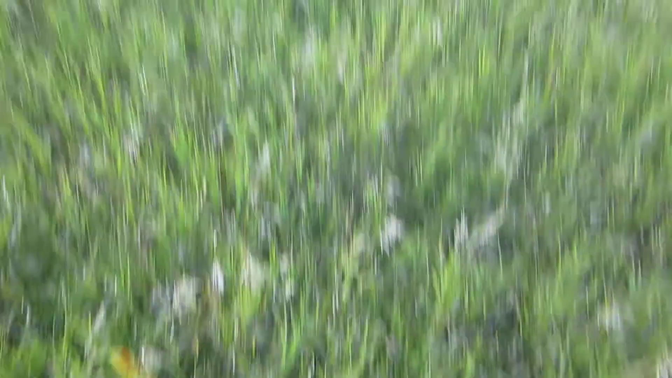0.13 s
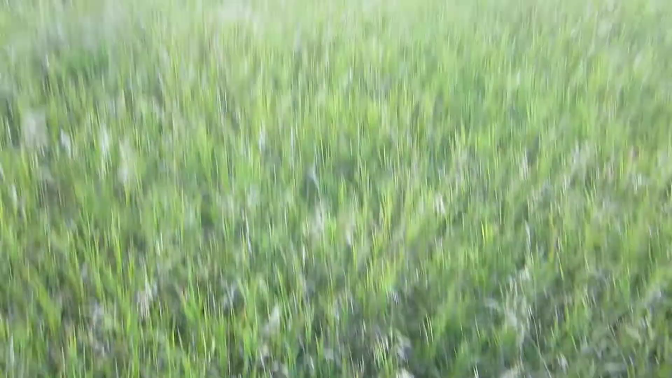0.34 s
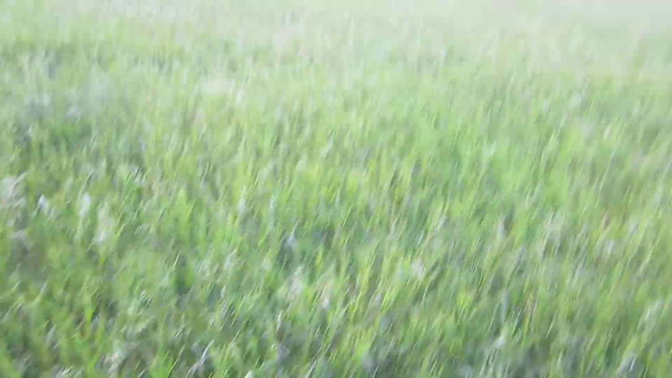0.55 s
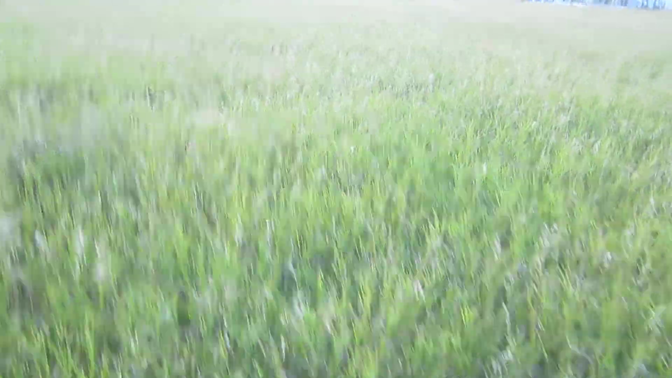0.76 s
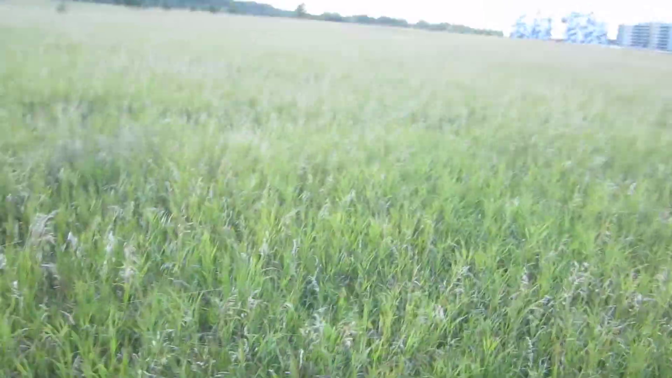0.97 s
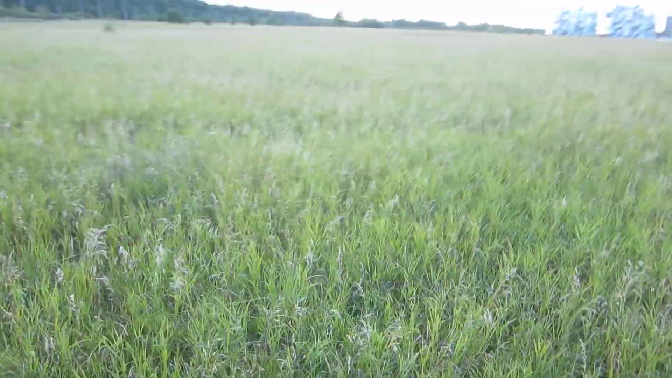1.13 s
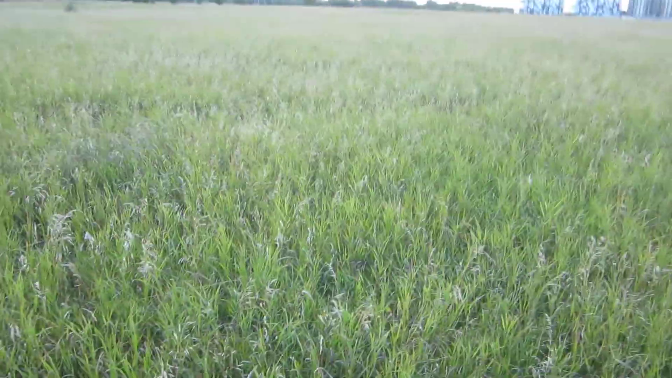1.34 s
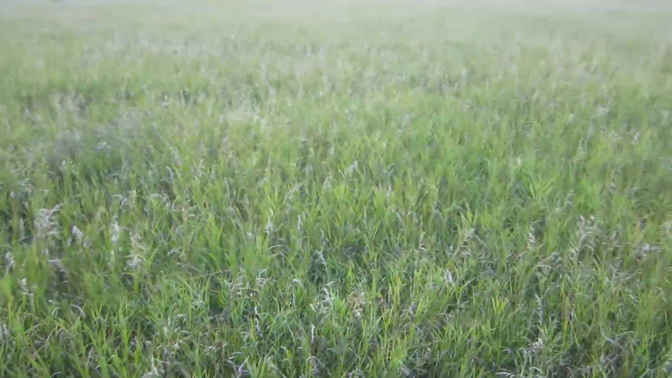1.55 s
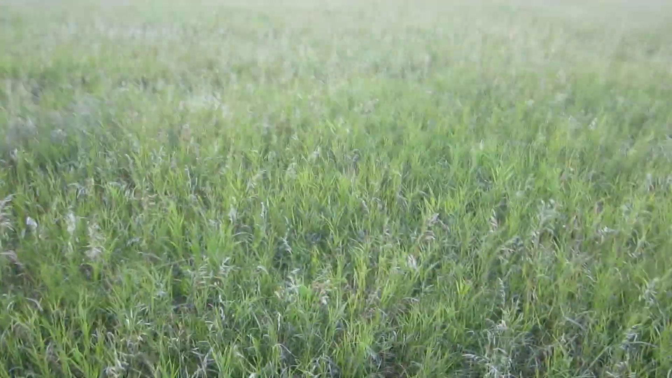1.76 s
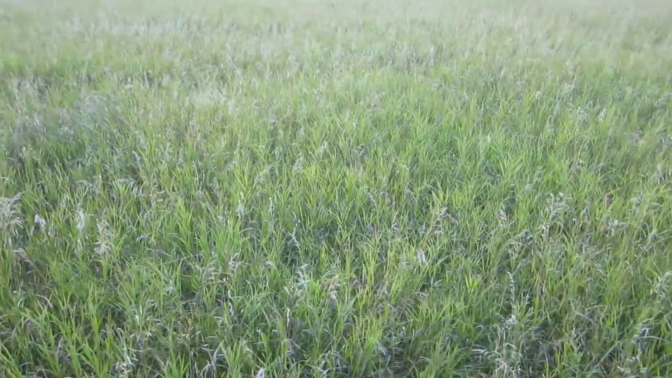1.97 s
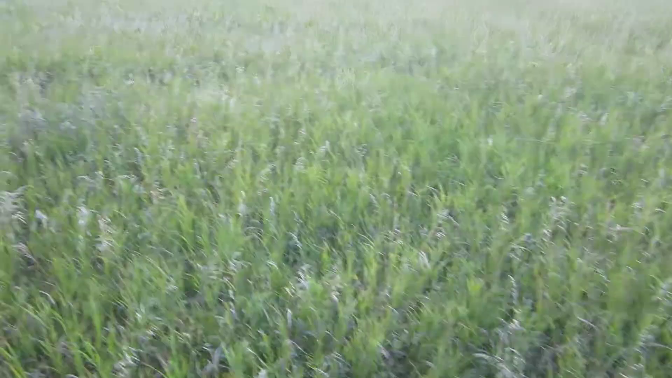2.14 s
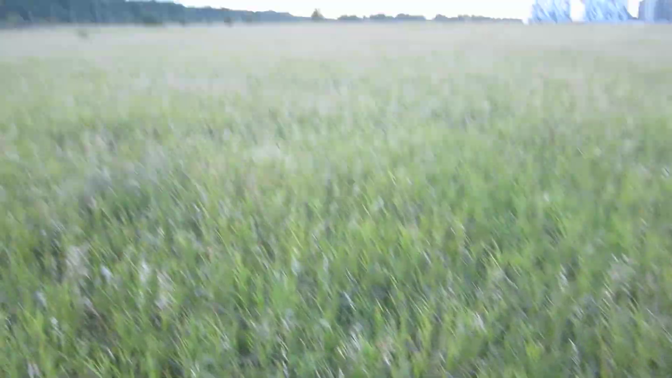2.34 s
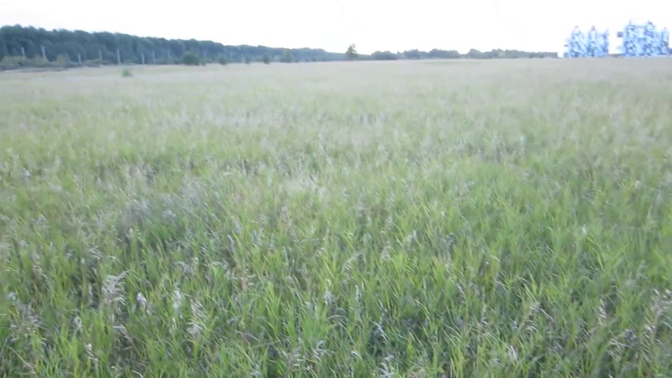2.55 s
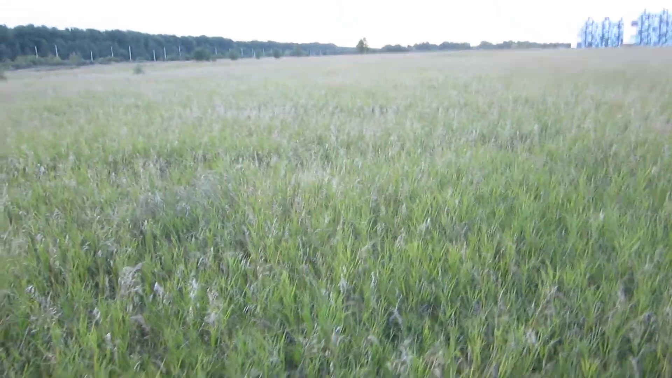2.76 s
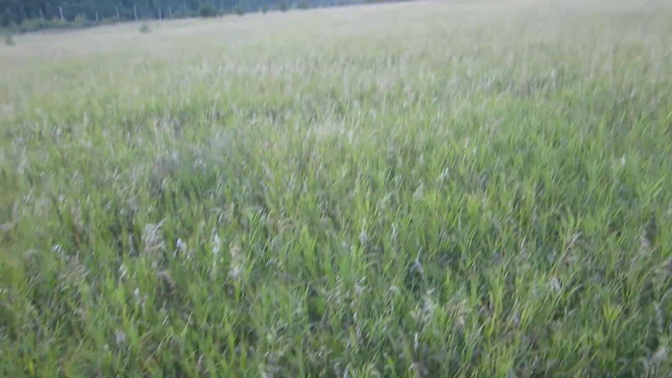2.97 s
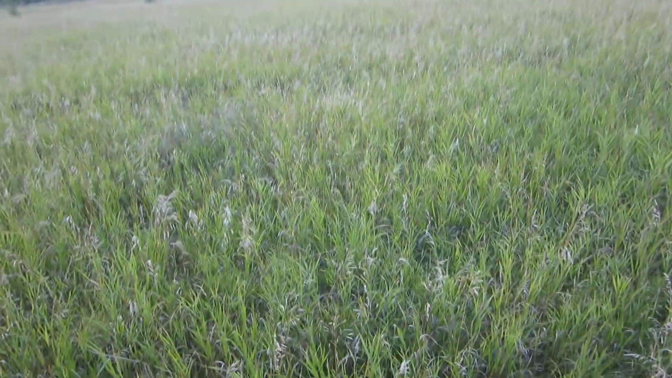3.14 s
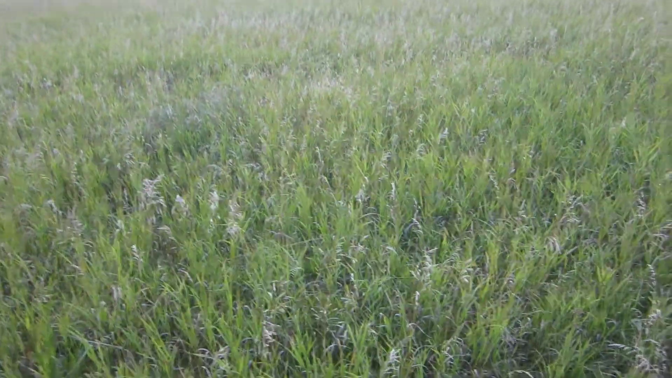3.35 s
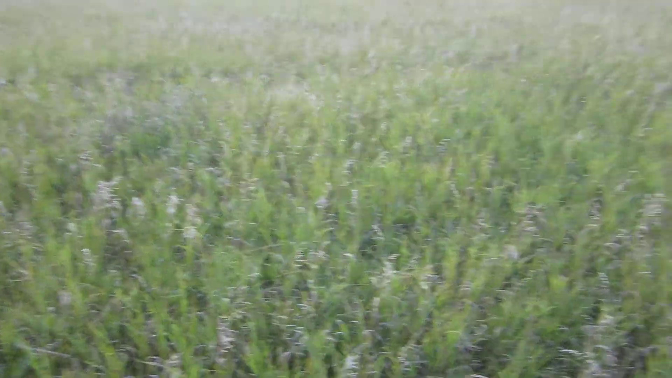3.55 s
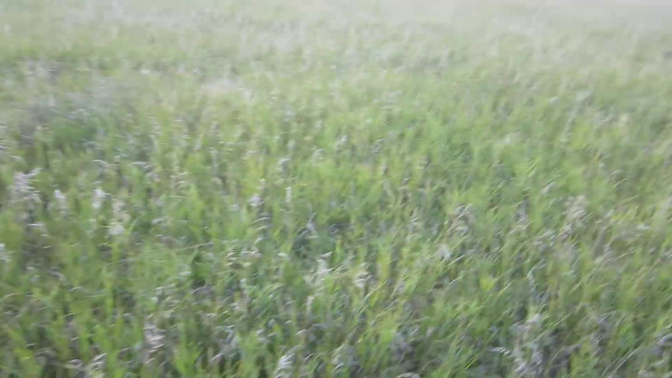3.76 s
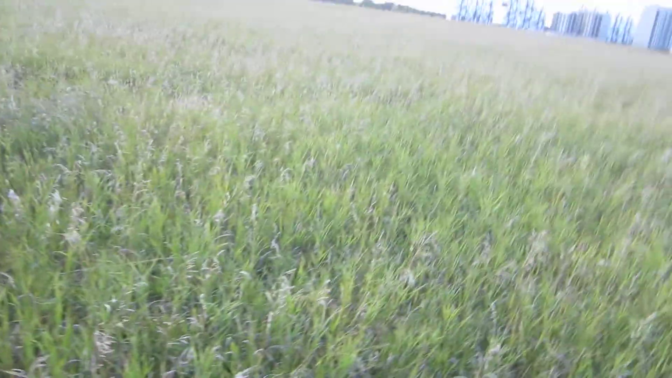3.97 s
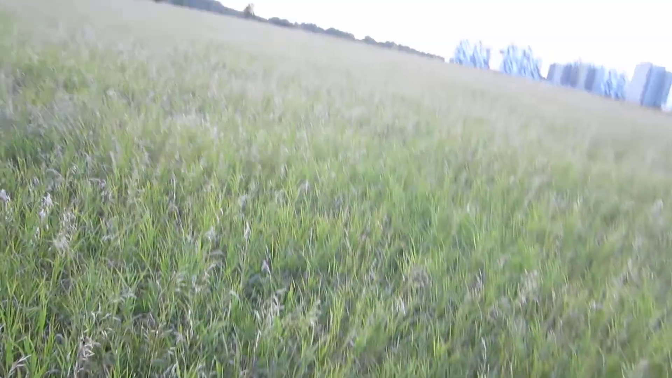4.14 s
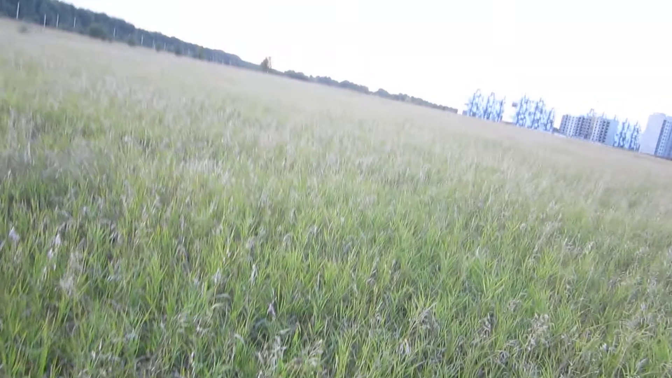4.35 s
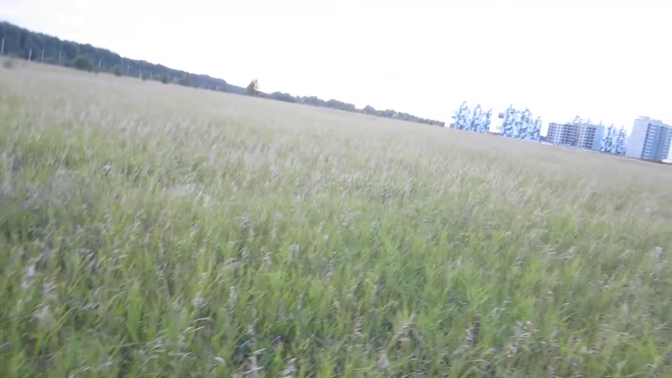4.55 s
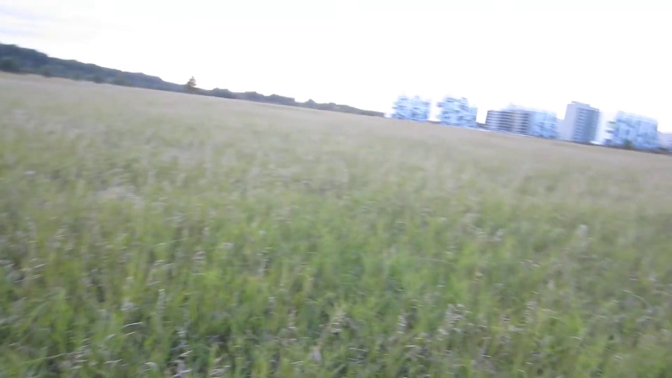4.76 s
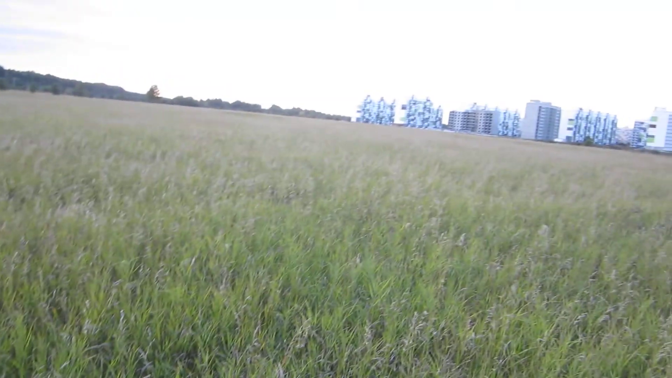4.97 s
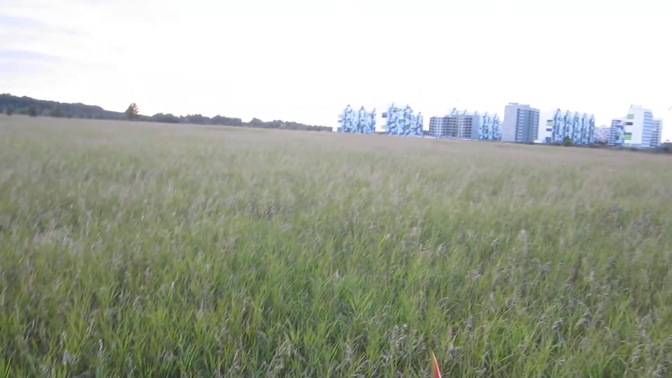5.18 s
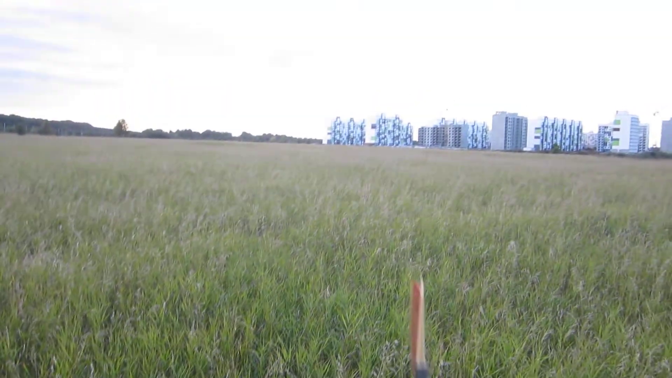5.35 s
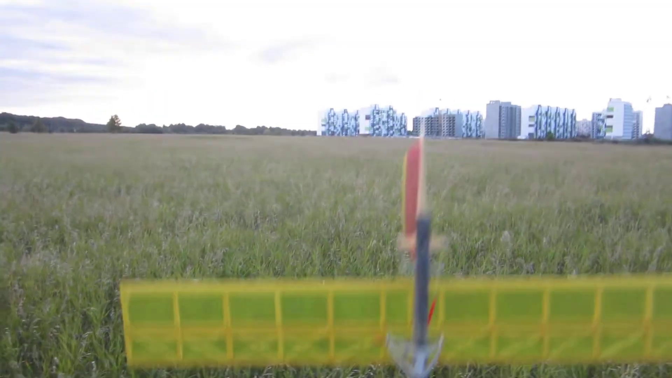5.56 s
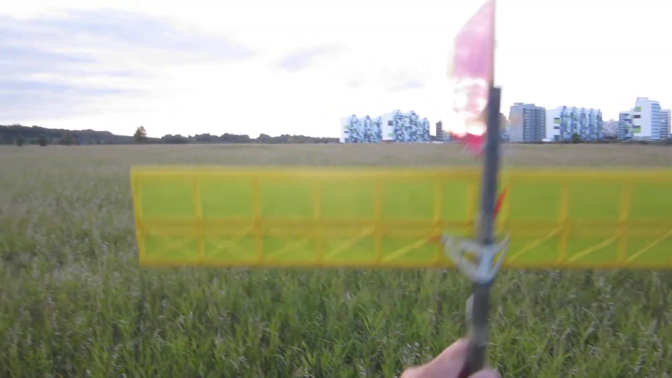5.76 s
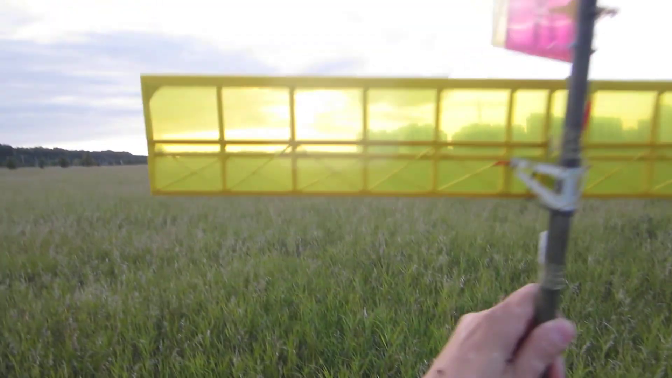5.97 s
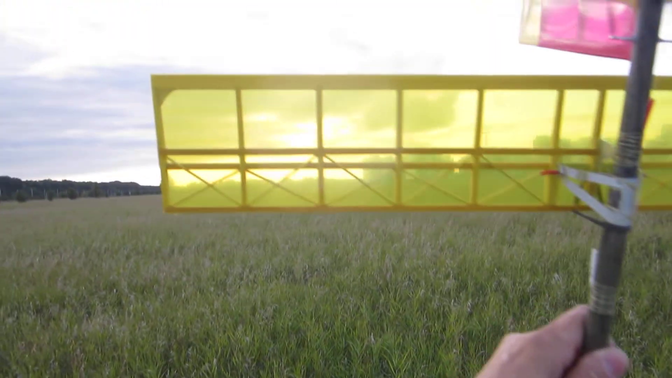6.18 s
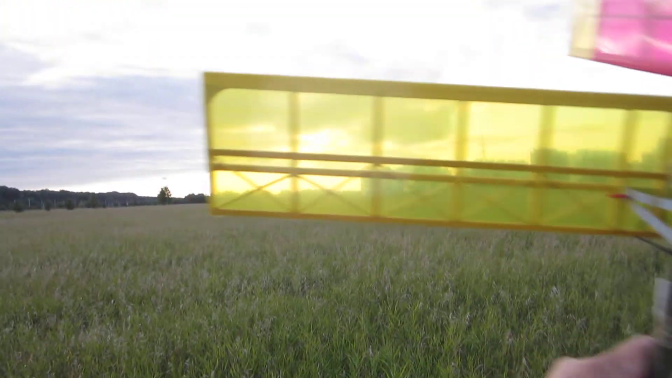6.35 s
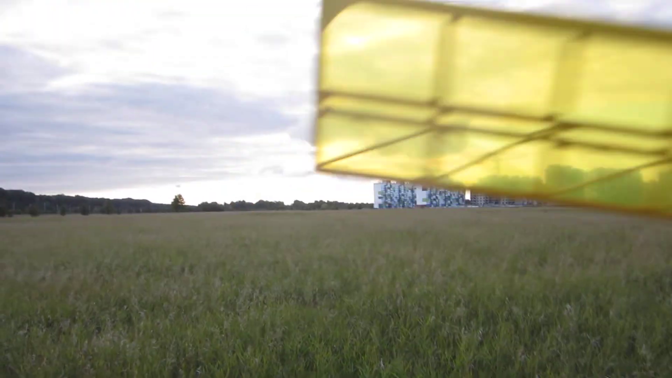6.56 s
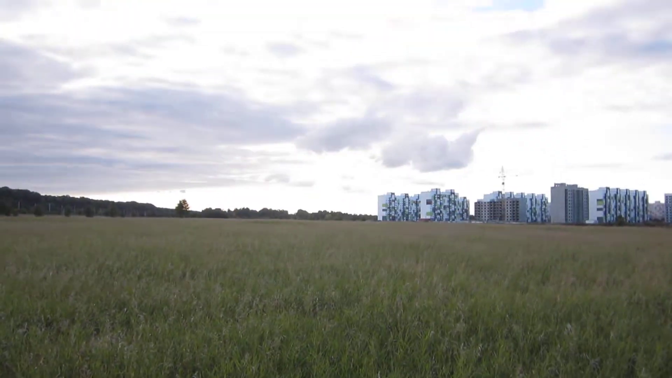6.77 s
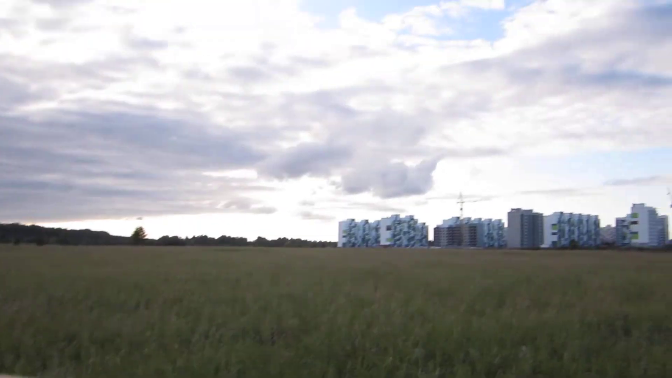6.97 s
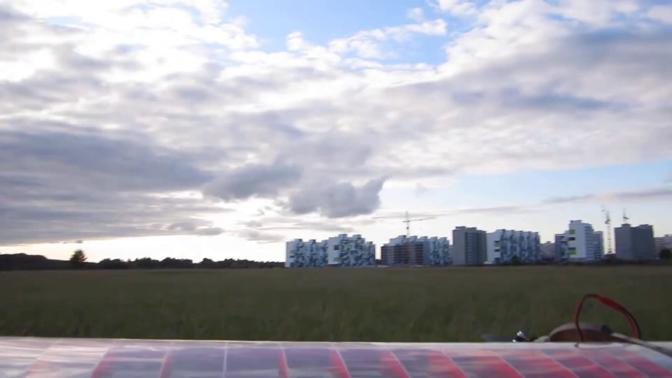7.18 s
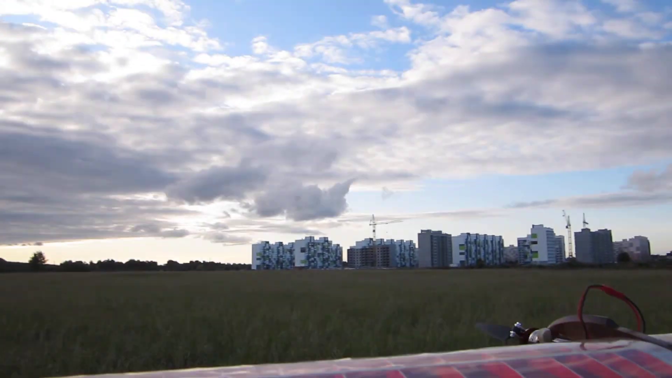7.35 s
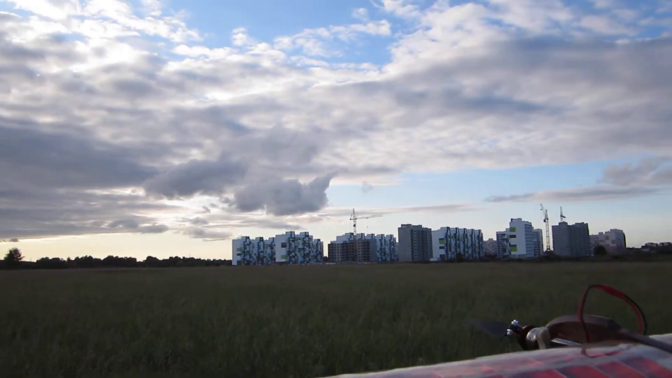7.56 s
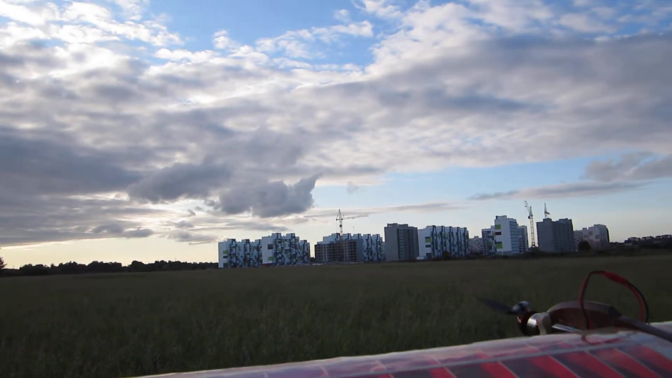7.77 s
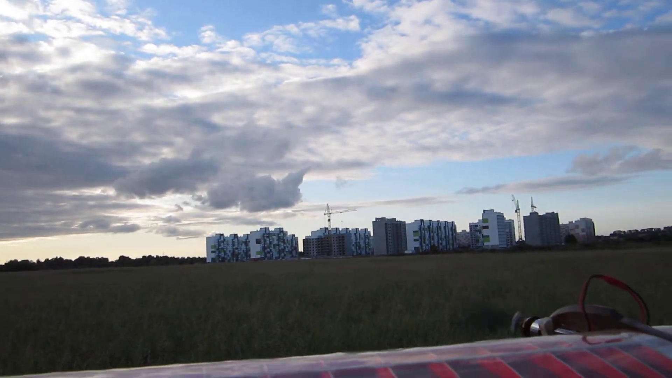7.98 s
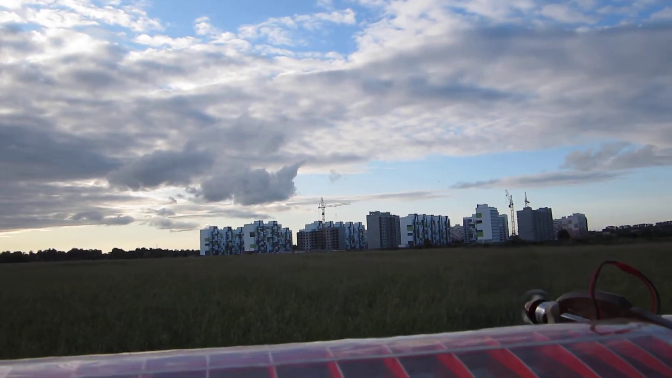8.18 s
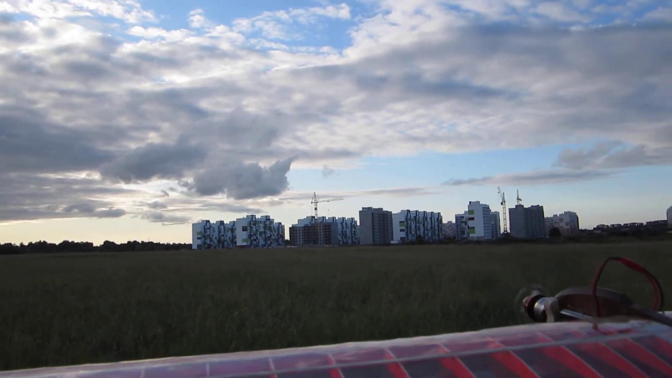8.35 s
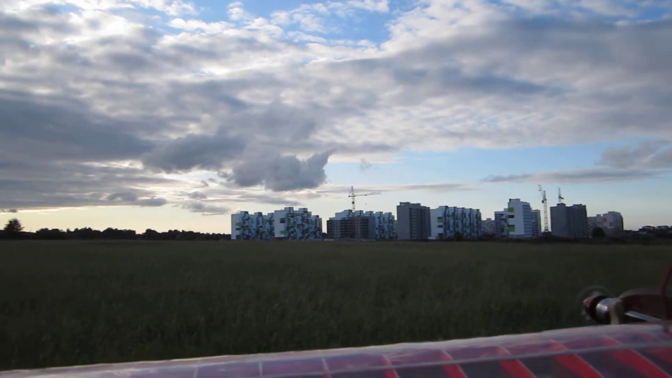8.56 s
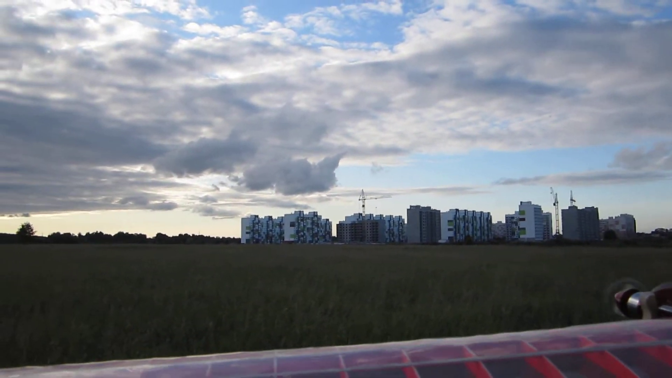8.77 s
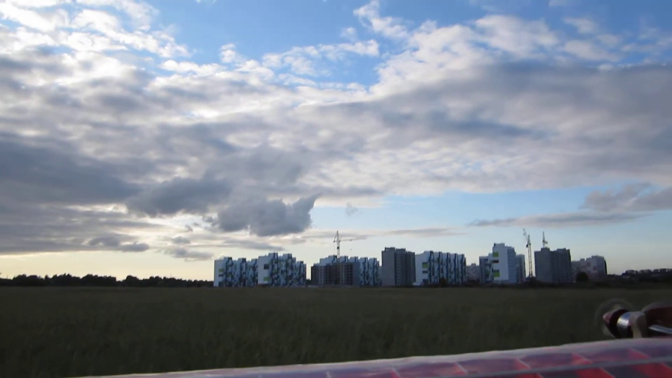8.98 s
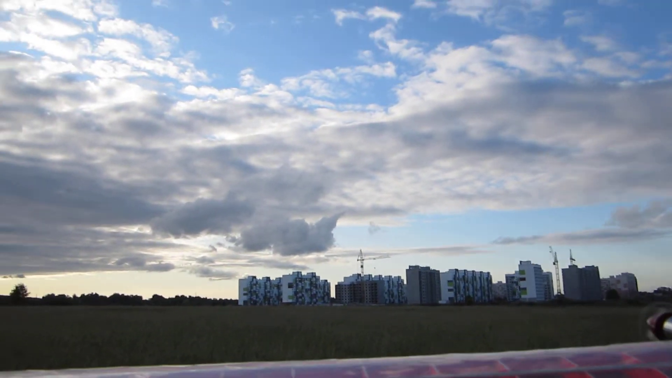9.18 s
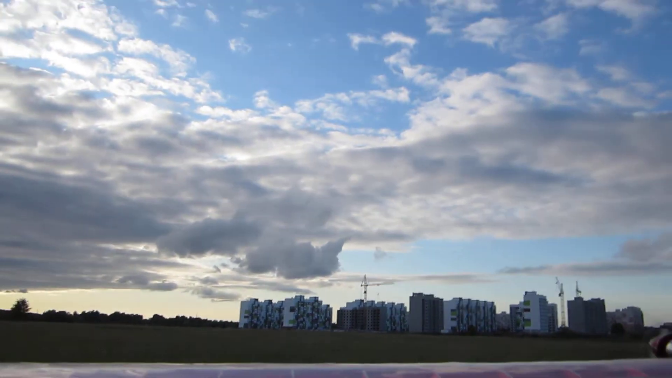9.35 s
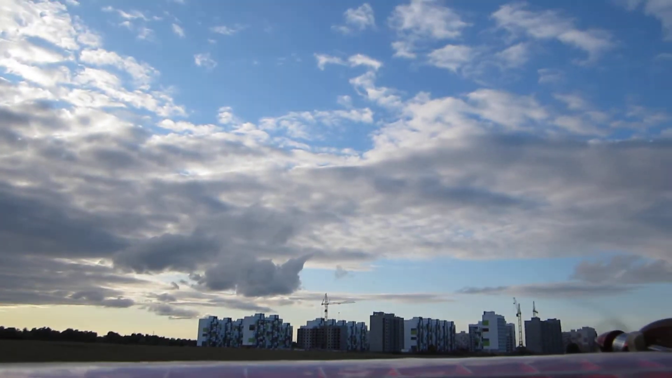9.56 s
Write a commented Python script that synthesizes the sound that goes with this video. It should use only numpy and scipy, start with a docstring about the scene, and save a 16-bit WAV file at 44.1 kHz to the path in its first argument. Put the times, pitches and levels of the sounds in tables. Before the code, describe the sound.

A dry, open field with faint low wind and a soft distant rush. A brief grass swish comes at 0.4 s and a small low blip near 1 s. Close plastic clicks cluster at 1.5 and 1.75 s, with a snap at 2.05 and a strong click at 2.7. A light scrape and finger rubs follow around 2.9-3.2 s. Grass swishes softly around 3.4-3.7 and more clearly at 5 s, among isolated tiny ticks. From about 5.3 s a thin servo buzz emerges, growing closer; linkage ticks and a brief high note sound near 7.1 s. Soft low bumps come at 7.4-7.8 s. At 7.7 s a motor stutters roughly with a piercing high whistle, catching at 8.05 s. The rotor then speeds up to 9.6 s, growl, rasp and propeller hiss building, whine lines climbing and fanning out while the whistle barely drifts, dipping around 8.9 s then recovering.

```python
"""A small electric glider's brushless motor stutters, catches and spins up, built from sine lines and noise that
follow one shaft: the controller's whistle drifts only a little while the rotor's lines climb and fan out around it.
Before that, filtered noise makes the wind and the tall grass someone wades through; short rings and tiny impacts
make fingers that click and rub close to the microphone, among short pitched ticks. A ticking servo buzzes louder
as the model comes close, its linkage chatters, and soft low bumps each bring a short rumble."""
import sys
import numpy as np
from scipy import signal
from scipy.fft import rfft, irfft, next_fast_len
from scipy.io import wavfile
from scipy.ndimage import uniform_filter1d, map_coordinates

SR = 44100
rng = np.random.default_rng(int(sys.argv[2]) if len(sys.argv) > 2 else 0)


def wrap_up_sound(samples):
    """Save the sound to the file named by the first command line argument, as 16-bit audio."""
    columns = np.atleast_2d(samples).T
    # keep every value between -1 and 1, then stretch to whole-number steps
    tamed = np.clip(columns, -1, 1)
    steps = np.round(tamed * 32767).astype(np.int16)
    wavfile.write(sys.argv[1], SR, steps)


N = 424241
TIME = np.arange(N) / SR  # s

# Colour tables only shape a sound; its loudness is set elsewhere.
# Wind over the field: (time [s], relative rumble level [dB], relative distant rush level [dB])
WIND = [(0.0, -53, -46.5), (0.6, -55, -43), (3.15, -55, -45), (7.3, -54.5, -45.5)]
# Colour of the far rush: (frequency [Hz], level [dB per Hz])
RUSH_COLOUR = [(70, -27), (130, -2.5), (220, -9.5), (400, -5.5), (680, 0), (1200, -7.5), (1600, -14),
               (2200, -16), (2900, -27), (4800, -39), (11000, -34), (15800, -27.5)]
# Colour of wind at the microphone: (frequency [Hz], level [dB per Hz])
RUMBLE_COLOUR = [(15, -4), (48, 3.5), (76, -6), (120, -13), (300, -44)]

# Legs sweeping through the stems: (time of the height [s], level [dB], length [s])
STRIDES = [(.38, -51, 0.023), (2.7, -58, 0.42), (3.42, -52.5, 0.11), (3.7, -55, 0.8), (5.02, -47.5, 0.39),
           (7.17, -55.5, 0.53)]
# Colour of the swishing stems: (frequency [Hz], level [dB per Hz])
STEM_COLOUR = [(800, -20.5), (2060, -5), (5300, -9), (12500, -15), (15800, -14.5)]
STIR_DB = -63  # stems stirring between strides

# Servo buzz, louder as the model comes close: (time [s], relative level [dB])
SERVO_LEVEL = [(5.3, -71), (5.8, -63), (6.6, -64.5), (7.1, -57), (7.75, -53.5), (8.1, -45)]
# Colour of the servo's gears: (frequency [Hz], level [dB per Hz])
GEAR_COLOUR = [(1200, -48), (1900, 14.5), (2120, 16.5), (2600, 10.5), (3700, 7.5), (4700, 12), (5800, 11),
               (6600, -2), (12000, -67)]
# Small ticks of the control linkage: (time [s], relative level [dB])
LINKAGE_TICKS = [(7.0853, -30.5), (7.1099, -31.5), (7.427, -38)]
# Colour of the linkage: (frequency [Hz], level [dB per Hz])
LINKAGE_COLOUR = [(1500, -40), (3000, 15), (6000, 13), (10000, -30)]
SING_S, SING_LENGTH_S, SING_HZ, SING_DB = 7.05, 0.21, 4520, -59.5  # the servo sings briefly on one note

# Clicks and knocks of handling: (time [s], relative level [dB], relative thud [dB], relative snap [dB])
KNOCKS = [(1.462, -23, -17, -10), (1.47, -42, -20, -8), (1.483, -23.5, -28, -21), (1.497, -29, -7.5, -8),
          (1.501, -32, -10, -10), (1.513, -24, -10.5, -15.5), (1.53, -32, -18, -9), (1.542, -33, -10, -13),
          (1.726, -17.5, -11.5, -21), (1.732, -20.5, -14.5, -15), (1.751, -31, -4, -12),
          (1.766, -31, -15, -9), (2.052, -28.5, -32, -1), (2.705, -15, -45, -28), (2.956, -25, -20.5, -28),
          (3.193, -30.5, -17, -34), (4.143, -33, -22, -5), (5.065, -25.5, -38, -9), (5.072, -29, -24, -26),
          (6.494, -26, -16.5, -14.5), (7.729, -32, -28, -11), (7.796, -27, -22, -8)]
# Colour of the ringing camera case: (frequency [Hz], level [dB per Hz])
CASE_COLOUR = [(120, -34), (220, 2), (630, 5), (830, 8.5), (1060, 0), (1300, 7.5), (2200, -1.5),
               (3100, -16.5), (6500, -47)]
# Colour of the bright snap: (frequency [Hz], level [dB per Hz])
SNAP_COLOUR = [(1500, -10), (3500, 2.5), (6000, -0.5), (10000, -6), (15000, -15)]
# Colour of low thuds: (frequency [Hz], level [dB per Hz])
THUD_COLOUR = [(20, -13), (75, -0.5), (170, -4.5), (350, -18.5), (900, -49)]
# Short pitched ticks, as of snapping stems, and one low blip:
# (time [s], frequency [Hz], level [dB], width [s])
PITCHED_TICKS = [(0.987, 490, -33, 0.0071), (2.345, 6060, -43.5, 0.0083), (4.765, 4800, -37, 0.0017),
                 (5.343, 5770, -45.5, 0.0043), (6.964, 6170, -43.5, 0.0026)]
# Strokes of a finger over the case: (time of the height [s], level [dB], length [s])
STROKES = [(1.76, -37, 0.013), (2.912, -39, 0.0098), (3.005, -34.5, 0.027), (3.135, -37, 0.079),
           (3.195, -36, 0.012)]
# Colour of skin on the case: (frequency [Hz], level [dB per Hz])
SKIN_COLOUR = [(150, -53), (370, 6), (470, -10), (620, 9.5), (850, -5), (1350, -1), (1700, -19),
               (2150, -18), (2700, -19), (5200, -19.5), (15000, -26)]
# Nasal colour of the light scrape: (frequency [Hz], level [dB per Hz])
NASAL_COLOUR = [(1000, -14), (2000, 0), (3000, -24)]
SCRAPE_S, SCRAPE_DB, SCRAPE_LENGTH_S = 2.89, -51, 0.11  # one light scrape leads into later strokes
SNAP_T60_S, SIZZLE_DB = 0.003, -7  # a snap is over at once and leaves a faint sizzle

# Soft low bumps: (time [s], push before the low cut [dB], width [s])
BUMPS = [(7.436, -22, 0.0027), (7.455, -13.5, 0.002), (7.476, -14, 0.0018), (7.544, -12.5, 0.0021),
         (7.557, -16.5, 0.00094), (7.62, -27, 0.0028), (7.681, -25, 0.0045), (7.81, -20.5, 0.0032),
         (8.06, -24, 0.0057), (8.087, -24, 0.0021), (9.13, -26, 0.0038)]
BUMP_RUMBLE_DB, BUMP_RUMBLE_S = -20, 0.045  # short rumble of each bump: level against the push, length

# Rotor speed: (time [s], speed [turns a second])
SHAFT_SPEED = [(8.04, 10.5), (8.14, 23.6), (8.23, 32.2), (8.35, 40.8), (8.55, 51.1), (8.72, 60.7),
               (8.8, 63.3), (9.02, 69.5), (9.28, 78.6), (9.62, 95.2)]
# Growl of propeller and bearings: (multiple of shaft speed, level before load and wing resonance [dB])
GROWL_LINES = [(1, -41), (2, -39.5), (3, -49), (5, -50.5), (7, -53), (8, -51.5), (10, -47.5), (11, -48.5),
               (12, -48.5), (13, -35.5), (14, -35.5), (15, -45), (17, -42)]
# Resonances of the wing: (frequency [Hz], level [dB])
WING_RESONANCE = [(55, -20.5), (73, 2.5), (115, -23.5), (190, -6), (290, -12), (410, -2), (500, -19),
                  (630, 6), (710, -3.5), (880, 1), (975, -5), (1030, 0.5), (1110, -15.5), (1270, -1),
                  (1600, -15)]
# Rate of the controller's switching, drifting down: (time [s], frequency [Hz])
SWITCHING_RATE = [(7.73, 7836), (8.05, 7820), (8.3, 7799), (9.17, 7772), (9.62, 7752)]
# The switching whistle: (time [s], level [dB])
WHISTLE_LEVEL = [(7.73, -19), (8.05, -17), (8.3, -18), (8.65, -20), (8.9, -32.5), (9.17, -22.5),
                 (9.62, -19)]
# Magnetic whine: (multiple of switching rate, multiple of shaft speed, level before the mount [dB])
WHINE_LINES = [(0, 42, -28.5), (0, 63, -37.5), (0, 84, -33), (0, 126, -38.5), (0.999, -168, -43),
               (1, -126, -42), (1, -84, -42.5), (1, -63, -39.5), (1, -42, -40), (1, -21, -37.5),
               (0.999, 14, -36.5), (1, 42, -31.5), (1, 84, -37), (1, 126, -39), (2, -42, -39)]
# How well the mount passes on sound: (frequency [Hz], level [dB])
MOUNT_RESPONSE = [(600, -21), (770, -3.5), (1100, -25.5), (1900, -8), (2800, -4), (4200, 0), (6200, 5.5),
                  (6800, -10.5), (9300, -11.5), (11000, -24.5), (15000, -25)]
RIPPLE_DB, RIPPLE_HZ = 4, 130  # scale and spacing of the mount's many small resonances
OCTAVE_DB = -40.5  # second harmonic of the switching, once the rotor has caught
START_S, CATCH_S = 7.727, 8.036  # power on, rotor catches

# The controller jerks the rotor: (time [s], level [dB], time to die by 60 dB [s])
JERKS = [(7.726, -40.5, 1.3), (7.802, -24, 0.32), (7.887, -35, 0.46), (7.962, -34, 1.4), (8.03, -32, 1.9),
         (8.056, -37, 0.46), (8.132, -33.5, 0.7)]
# Colour of the jerking rotor: (frequency [Hz], level [dB per Hz])
STUTTER_COLOUR = [(150, -18), (370, -0.5), (550, -3), (850, 4), (1550, -10), (3000, -3), (4100, -6.5),
                  (4650, 3.5), (5850, 0), (7000, -13), (10700, -18.5), (15000, -24)]
# Thin fizz at the start of each jerk: (frequency [Hz], level [dB per Hz])
FIZZ_COLOUR = [(7000, -22), (10700, -21), (11500, 11), (15000, -8)]
JERK_ATTACK_S = 0.004
FIZZ_DB, FIZZ_S = -10.5, 0.013  # level against the jerk, length
# Colour of the rasping airframe at speed: (frequency [Hz], level [dB per Hz])
FRAME_COLOUR = [(300, -19), (500, -24.5), (650, -11), (1000, 1), (2100, -2.5), (3000, 0.5), (5500, -2.5),
                (7200, -7.5), (10000, -27), (15000, -20)]
RASP_DB, RASP_SPEED = -26.5, 68.8  # setting at the shaft speed that rasps most (turns a second)
RASP_BELOW_DB, RASP_ABOVE_DB = 0.32, 0.07  # loss for each turn a second off that speed
WING_RASP_DB = -11.5  # share of the rasp that rings the wing
# Colour of air thrown by the propeller: (frequency [Hz], level [dB per Hz])
PROPELLER_COLOUR = [(3000, -15.0), (8000, 11.0), (11000, 2.5), (15500, -8)]
# Narrow resonances of the airframe: (frequency [Hz])
SPARS = [1040, 1278, 2763, 3080, 3650, 3990, 4540, 5720]
TOP_HZ = 15950  # upper band limit


def amp(db):
    """Turn decibels into gain."""
    return 10 ** (np.asarray(db) / 20)


def unit(x):
    """Scale to an average strength (rms) of 1."""
    return x / np.sqrt(np.mean(x ** 2) + 1e-20)


def along(points, hz):
    """Read a (frequency, value) table on a log frequency axis."""
    f, v = np.transpose(points)
    return np.interp(np.log(np.abs(hz) + 1), np.log(f + 1), v)


def curves(rows):
    """Draw one curve over time for each column after the time."""
    s, *columns = np.transpose(rows)
    return [np.interp(TIME, s, column) for column in columns]


def wobble(rate):
    """Make a smooth random curve with the given number of random points a second."""
    coarse = TIME[::64]
    points = rng.standard_normal(int(N * rate / SR) + 4)
    return np.interp(TIME, coarse, map_coordinates(points, [coarse * rate]))


def after(s):
    """Fade from 0 to 1 in 2 ms, starting at time s."""
    return np.clip((TIME - s) * 500, 0, 1)


def phase(hz):
    """Add up a changing frequency into a running angle."""
    return 2 * np.pi * np.cumsum(hz) / SR


def colour(x, spectrum):
    """Filter to a (frequency, level) shape without smearing sound ahead of its cause; rms 1."""
    m = 2 * next_fast_len(len(x) // 2 + 2048)
    gain = amp(along(spectrum, np.fft.rfftfreq(m, 1 / SR)))
    # folding the cepstrum forward gives the filter its minimum phase
    cepstrum = irfft(np.log(gain + 1e-6))
    cepstrum[1:m // 2] *= 2
    cepstrum[m // 2 + 1:] = 0
    response = np.exp(rfft(cepstrum))
    return unit(irfft(rfft(x, m) * response)[:len(x)])


def noise(spectrum):
    """Make smooth noise of a given colour."""
    return colour(rng.standard_normal(N), spectrum)


def grains(rate, spread_db):
    """Scatter tiny impacts of uneven size, about rate a second; rms 1."""
    size = amp(spread_db * np.clip(rng.standard_normal(N), -2, 2))
    hits = rng.random(N) < rate / SR
    return unit(hits * size * rng.choice([-1, 1], N))


def burst(spectrum, t60):
    """Make a short ring of a given colour from noise that dies by 60 dB in t60 seconds."""
    t = np.arange(SR // 5) / SR
    return colour(rng.standard_normal(len(t)) * amp(-60 * t / t60), spectrum) / np.sqrt(len(t))


def swells(rows, rise=1, fall=1):
    """Overlap (time, level, length) gestures that each swell and ebb, adding their powers."""
    power = np.zeros(N)
    for s, db, length in rows:
        away = np.maximum((s - TIME) / rise, (TIME - s) / fall) / length
        power += amp(2 * db) * np.exp(-2 * np.minimum(away, 10) ** 1.28)
    return np.sqrt(power)


def add(track, s, sound):
    """Mix a sound into the track at time s."""
    part = track[round(s * SR):][:len(sound)]
    part += sound[:len(part)]


def pulses(angle):
    """Give one click for each full turn of an angle; rms 1."""
    return unit(np.diff(np.floor(angle / (2 * np.pi)), prepend=0))


def field():
    """Light wind rumbles at the microphone under the far rush of the open land."""
    rumble_db, rush_db = curves(WIND)
    rumble = amp(rumble_db + 4.0 + 3.0 * wobble(7)) * noise(RUMBLE_COLOUR)
    rush = amp(rush_db - 2.0 + 1.5 * wobble(8.3)) * noise(RUSH_COLOUR)
    return rumble + rush


def grass():
    """Stems swish against the legs at each stride, in little clumps as each one springs back."""
    clumps = amp(1.9 * wobble(180) + wobble(30))
    sweep = np.hypot(swells(STRIDES), amp(STIR_DB))
    return sweep * colour(clumps * rng.standard_normal(N), STEM_COLOUR)


def servo(ring_db=-13):
    """The servo's motor ticks fast and is nudged once per control frame; two overtones of the frame sing."""
    tick_hz, frame_hz = 237.2, 47.05
    fast_ticks = pulses(phase(tick_hz * (1 + 0.0005 * wobble(4))))
    nudges = pulses(phase(frame_hz * (1 + 0.0005 * wobble(4))))
    drive = fast_ticks + 0.55 * nudges + 0.12 * rng.standard_normal(N)
    ring = np.zeros(N)
    for overtone in (45, 100):
        ring += amp(ring_db + 4.0 * wobble(5.3)) * np.sin(2 * np.pi * overtone * frame_hz * TIME)
    return amp(curves(SERVO_LEVEL)[0]) * (colour(drive, GEAR_COLOUR) + ring)


def linkage(tick_db=8, chatter_db=-5):
    """As the servo moves, its linkage chatters and ticks and one note swells and fades."""
    swell = np.exp(-((TIME - SING_S) / SING_LENGTH_S) ** 2)
    note = np.sin(phase(SING_HZ * (1 + 0.002 * wobble(120))))
    out = amp(SING_DB + 2 * wobble(30)) * swell * note
    contacts = grains(rate=28, spread_db=-0.5)
    chatter = unit(signal.fftconvolve(contacts, burst(LINKAGE_COLOUR, t60=0.024))[:N])
    out += amp(curves(SERVO_LEVEL)[0] + chatter_db) * chatter
    for s, db in LINKAGE_TICKS:
        add(out, s, amp(db + tick_db) * burst(LINKAGE_COLOUR, t60=0.023))
    return out


def handling():
    """Fingers click and rub at the case, among short pitched ticks."""
    return pitched_ticks() + knocks() + rubbing()


def pitched_ticks():
    """Each tick is a brief, unsteady tone that starts with a tiny crack."""
    out = np.zeros(N)
    for s, hz, db, width in PITCHED_TICKS:
        tone = np.sin(phase(hz * (1 + 0.022 * wobble(300))))
        out += amp(db) * np.exp(-((TIME - s) / width) ** 2) * tone
        add(out, s - width, 2 * amp(db) * burst(SNAP_COLOUR, t60=2 * width))
    return out


def knocks():
    """Each knock rings the case, with a bright snap and a low thud."""
    out = np.zeros(N)
    for s, db, thud_db, snap_db in KNOCKS:
        snap_share = np.clip(amp(snap_db + 8.0), 0, 0.95)
        ring = burst(CASE_COLOUR, t60=0.075) + 0.8 * burst(CASE_COLOUR, t60=0.027)
        snap = burst(SNAP_COLOUR, t60=SNAP_T60_S) + amp(SIZZLE_DB) * burst(SNAP_COLOUR, t60=0.078)
        thud = amp(thud_db + 14.5) * burst(THUD_COLOUR, t60=0.084)
        knock = np.sqrt(1 - snap_share ** 2) * ring + snap_share * snap + thud
        add(out, s, amp(db + 15.0) * knock)
    return out


def rubbing():
    """A finger rubs in tiny slips, each followed by a short ring."""
    slips = grains(rate=1200, spread_db=4)
    slips = slips + 2 * unit(signal.fftconvolve(slips, burst(STEM_COLOUR, t60=0.055))[:N])
    scrape = swells([(SCRAPE_S, SCRAPE_DB, SCRAPE_LENGTH_S)]) * colour(slips, NASAL_COLOUR)
    return scrape + swells(STROKES) * colour(slips, SKIN_COLOUR)


def bumps():
    """Soft low bumps push once and swing back, each with a short rumble."""
    out = np.zeros(N)
    t = np.arange(SR // 10) / SR - 1 / 20
    for s, db, width in BUMPS:
        add(out, s - 1 / 20, amp(db) * np.exp(-(t / width) ** 2))
    rumbles = [(s, db + BUMP_RUMBLE_DB, BUMP_RUMBLE_S) for s, db, _ in BUMPS]
    out += swells(rumbles, rise=0.7, fall=0.96) * noise(THUD_COLOUR)
    # cutting the lows makes each push swing back
    return signal.sosfilt(signal.butter(2, 28, "high", fs=SR, output="sos"), out)


def motor():
    """Growl, whine, rattle and controller whistle share one shaft or one switching clock."""
    speed = uniform_filter1d(curves(SHAFT_SPEED)[0], size=2000)
    # the slow rotor lurches; inertia steadies it as it speeds up
    speed = speed + 9 / speed * wobble(400)
    turn = phase(speed)
    switch_hz = curves(SWITCHING_RATE)[0]
    chop = phase(switch_hz)
    running = growl(speed, turn) + whine(speed, turn, switch_hz, chop) + whistle(chop)
    # the octave is weaker while the rotor is only nudged
    octave = line(2 * chop, OCTAVE_DB - 9 * (1 - after(CATCH_S)))
    return after(CATCH_S) * running + after(START_S) * (rattle(speed, turn) + octave)


def line(angle, db):
    """Make one sine line with an unsteady level and a random starting angle."""
    level = np.sqrt(2) * amp(db + 1.8 * wobble(14) + 1.6 * wobble(110))
    return level * np.sin(angle + rng.uniform(0, 2 * np.pi))


def rattle(speed, turn):
    """Loose jerks give way to a rasp that follows the shaft, while the propeller throws more air."""
    shake = jerks(turn) + after(CATCH_S) * rasp(speed, turn)
    return airframe(shake) + fizz() + propeller_air(speed)


def jerks(turn):
    """The controller kicks the rotor into rough, dying rattles; after the catch, passing magnets tug too."""
    kicks = np.zeros(N)
    for s, db, t60 in JERKS:
        attack = np.clip((TIME - s) / JERK_ATTACK_S, 0, 1)
        kicks += attack * amp(db - 60 * np.maximum(TIME - s, 0) / t60)
    # one tug as each of 14 magnets passes
    tugs = after(CATCH_S) * pulses(14 * turn) * amp(2.1 * wobble(200))
    rough = grains(rate=1000, spread_db=2) + 0.5 * rng.standard_normal(N) + 0.7 * tugs
    return kicks * colour(rough, STUTTER_COLOUR)


def airframe(x, q=45, ring_db=1):
    """The spars and skin pick out their own narrow resonances; the overall level is kept."""
    ring = sum(signal.lfilter(*signal.iirpeak(hz, q, fs=SR), x) for hz in SPARS)
    return unit(x + amp(ring_db) * ring) * np.std(x)


def fizz():
    """A thin, high hiss swells briefly at the start of each jerk."""
    puffs = [(s + FIZZ_S, db + FIZZ_DB, FIZZ_S) for s, db, _ in JERKS]
    return swells(puffs, rise=0.56, fall=1) * noise(FIZZ_COLOUR)


def propeller_air(speed):
    """The propeller throws hissing air, 13.3 dB louder for each doubling of shaft speed."""
    return amp(-37.0 + 13.3 * np.log2(speed / 70)) * noise(PROPELLER_COLOUR)


def growl(speed, turn):
    """The growl builds as the propeller takes up load; each line swells as it crosses a wing resonance."""
    load = np.minimum(speed / 55, 1) ** 5
    return load * sum(line(k * turn, db + along(WING_RESONANCE, k * speed)) for k, db in GROWL_LINES)


def whistle(chop):
    """The controller chops the current at its switching rate, heard as a nearly steady pitch."""
    level_db = curves(WHISTLE_LEVEL)[0] + 0.33 * wobble(40)
    return np.sqrt(2) * amp(level_db) * np.sin(chop)


def whine(speed, turn, switch_hz, chop):
    """Each commutation (switch between coils) modulates the chopping and shakes the mount."""
    ripple = RIPPLE_DB * rng.uniform(-1.3, 1, int(SR / RIPPLE_HZ))
    out = np.zeros(N)
    for m, k, db in WHINE_LINES:
        hz = m * switch_hz + k * speed
        # lines flicker as they sweep across the small resonances
        ripple_db = np.interp(np.abs(hz) / RIPPLE_HZ, np.arange(len(ripple)), ripple)
        out += line(m * chop + k * turn, db + along(MOUNT_RESPONSE, hz) + ripple_db)
    return out


def rasp(speed, turn):
    """Bearing scrape and noise pulse with the commutation and ring the frame and the wing."""
    # the same uneven bearing track comes round on every turn
    track = signal.resample(rng.standard_normal(400), 8192)
    place = turn / (2 * np.pi) % 1 * len(track)
    scrape = unit(map_coordinates(track, [place], order=1))
    commutation = 42 * turn
    pulsing = 1 + 0.5 * np.cos(commutation) + 0.83 * np.cos(commutation / 2)
    frame = colour(pulsing * (0.5 * scrape + rng.standard_normal(N)), FRAME_COLOUR)
    loss_db = np.maximum(RASP_BELOW_DB * (RASP_SPEED - speed), RASP_ABOVE_DB * (speed - RASP_SPEED))
    return amp(RASP_DB - loss_db) * (frame + amp(WING_RASP_DB) * colour(frame, WING_RESONANCE))


def scene():
    """Add up all the sources in an open field, with no echoes."""
    return (field() + grass() + servo() + linkage() + handling() + bumps() + motor())[None]


def record(dry):
    """The camera keeps nothing above its band limit."""
    m = next_fast_len(N + 8192)
    keep = np.fft.rfftfreq(m, 1 / SR) < TOP_HZ
    return irfft(rfft(dry, m) * keep, m)[..., :N]


dry = scene()
out = record(dry)
wrap_up_sound(out)
```